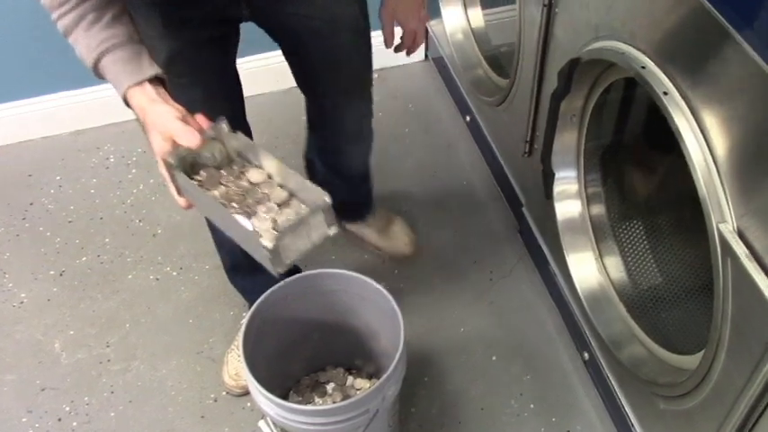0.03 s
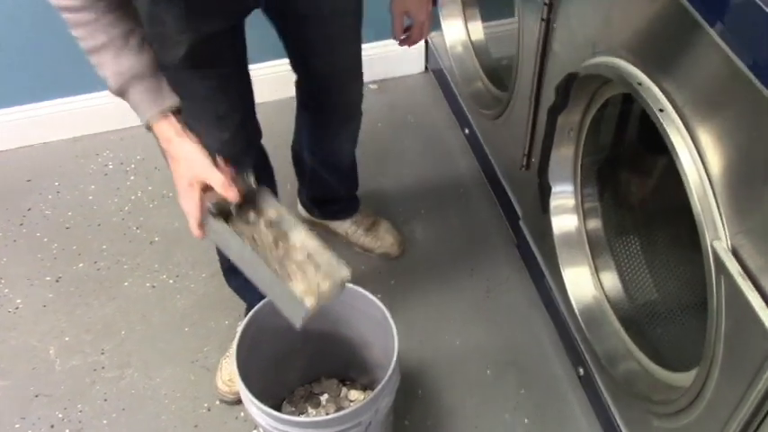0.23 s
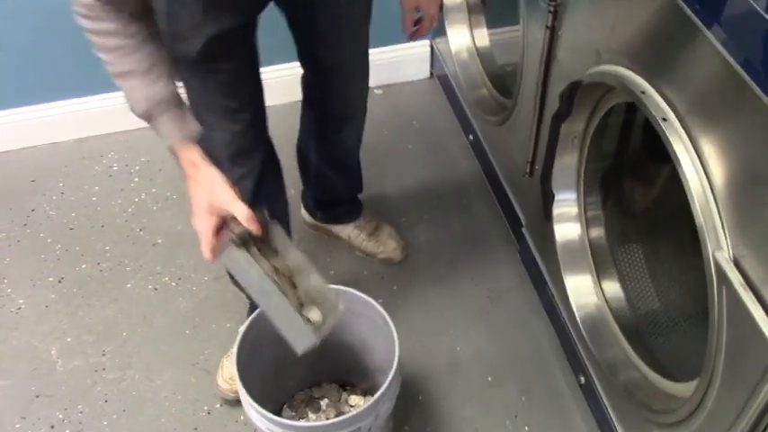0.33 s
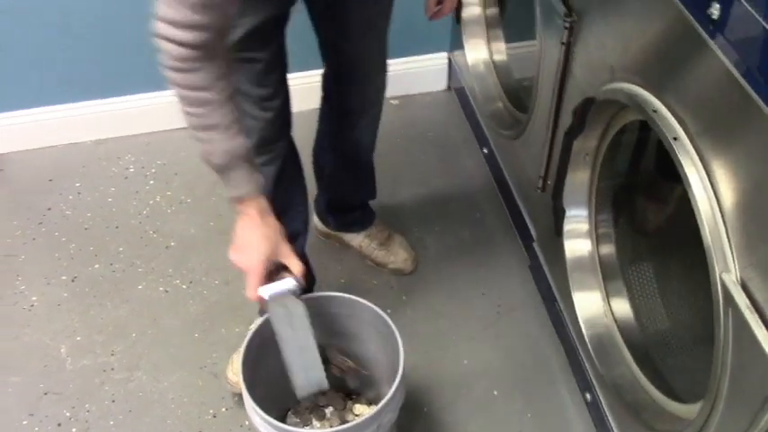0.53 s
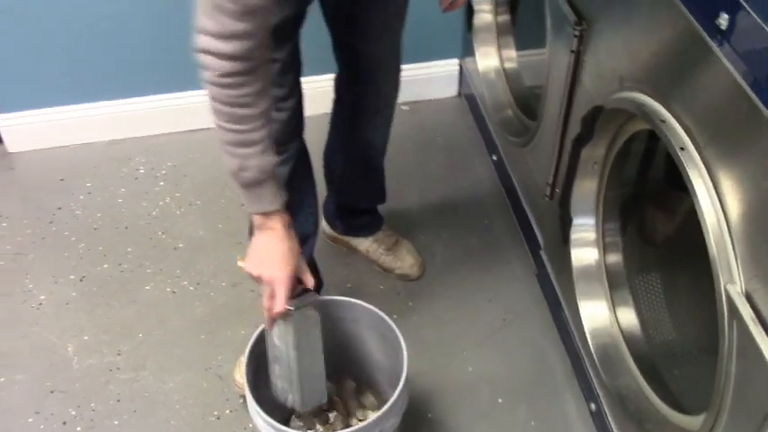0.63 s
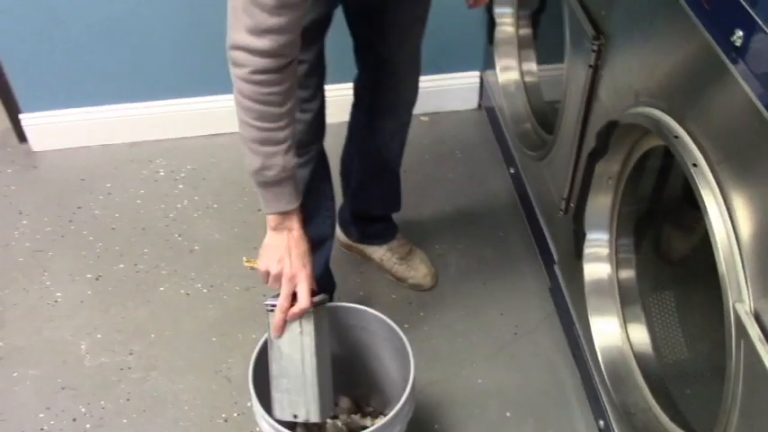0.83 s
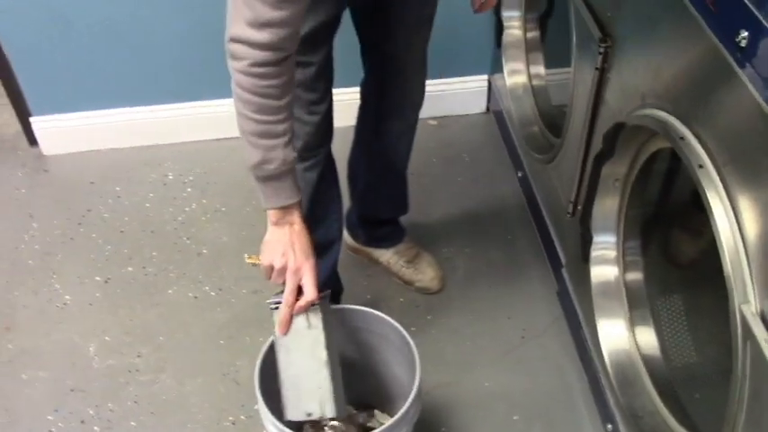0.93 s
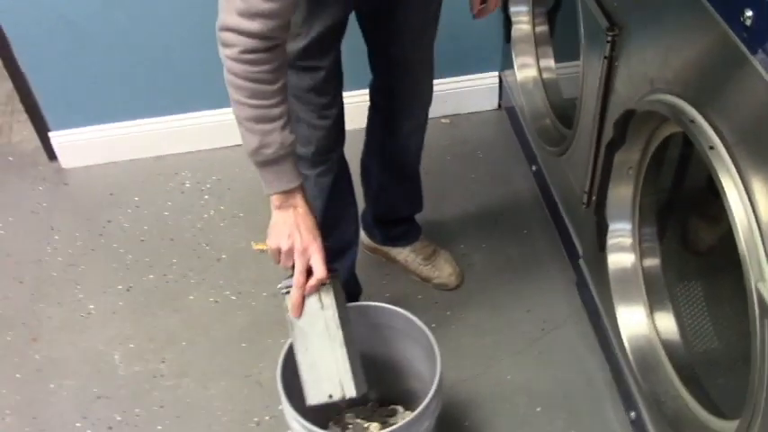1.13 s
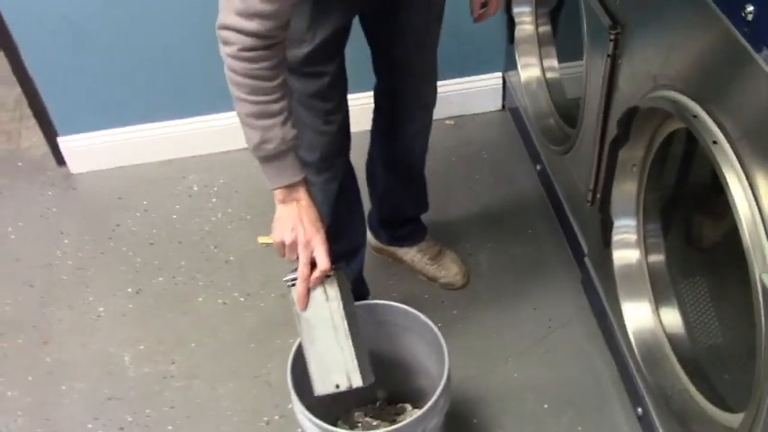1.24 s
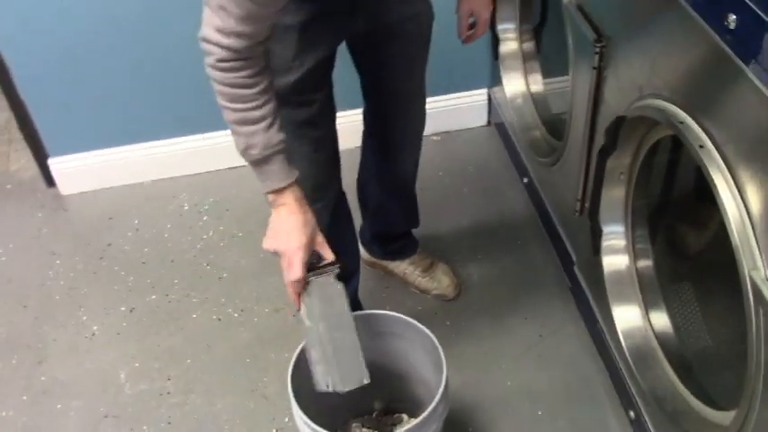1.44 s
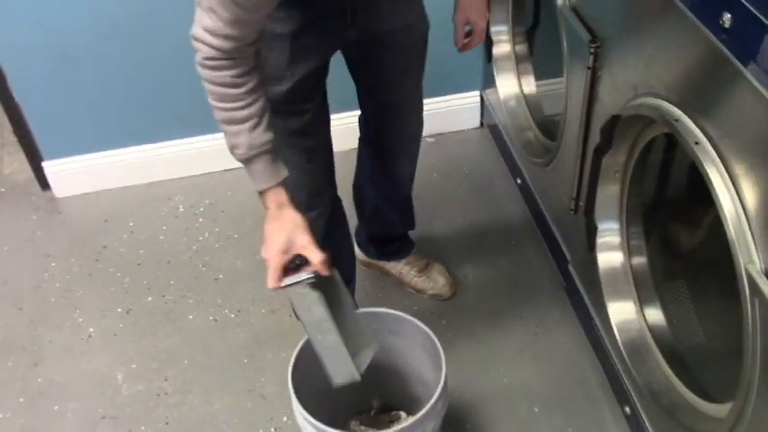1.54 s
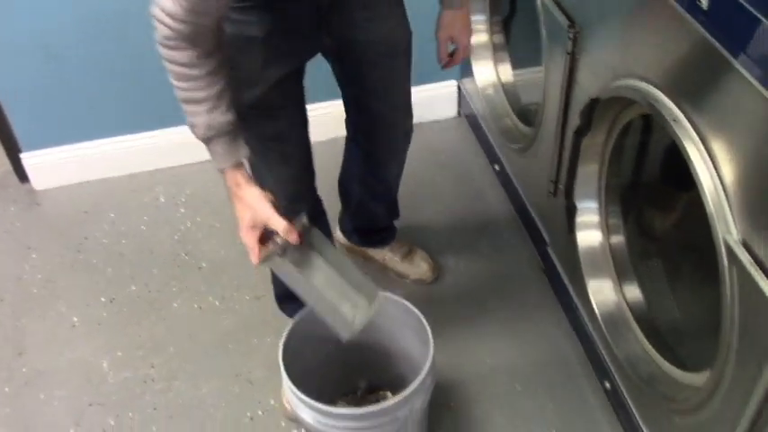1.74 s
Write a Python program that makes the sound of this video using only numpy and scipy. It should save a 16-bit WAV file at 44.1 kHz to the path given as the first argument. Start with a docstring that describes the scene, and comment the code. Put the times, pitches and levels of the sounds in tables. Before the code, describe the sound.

Coins clatter out of a steel box into a plastic bucket over rumbling laundry machines.

```python
"""Laundry machines rumble throughout in a hard-walled room. Coins shift in a steel coin box with a thin
scrape, then clatter down it as it tips. They pour into a plastic bucket partly filled with coins:
the stream clinks and rings on the heap, drums on the plastic and makes the bucket's floor boom.
Last, a few stragglers settle."""
import sys
import numpy as np
from scipy import signal
from scipy.io import wavfile
from scipy.ndimage import uniform_filter1d

SR = 44100
rng = np.random.default_rng(int(sys.argv[2]) if len(sys.argv) > 2 else 0)


def wav_out(sig):
    """Save sig, one row per channel (or a flat mono array), as 16-bit PCM at SR to the path in sys.argv[1]."""
    wavfile.write(sys.argv[1], SR, np.round(np.clip(np.atleast_2d(sig).T, -1, 1) * 32767).astype(np.int16))


N = 79380
T = np.arange(N) / SR
SLIDE_PER_S, POUR_PER_S, DRUM_PER_S, RINGS_PER_S = 3600, 3700, 1500, 1600  # coin contacts


def amp(db):
    """Decibels to gain."""
    return 10 ** (np.asarray(db) / 20)


def unit(x):
    """Scales to rms 1."""
    return x / np.sqrt(np.mean(x ** 2) + 1e-20)


def fader(curve):
    """Gain over time from (s, dB) points, silent before the first."""
    s, db = np.transpose(curve)
    return amp(np.interp(T, s, db, left=-100))


def read(points, hz):
    """Reads a table on a log-frequency axis."""
    f, value = np.transpose(points)
    return np.interp(np.log(hz + 1), np.log(f + 1), value)


def through(x, response):
    """Plays x through a response scaled to unit energy."""
    return signal.fftconvolve(x, response / np.linalg.norm(response))[:N]


def tick(spectrum, size=2048):
    """The shortest causal click with this spectrum."""
    log_gain = np.log(amp(read(spectrum, abs(np.fft.fftfreq(size, 1 / SR)))))
    return np.fft.ifft(np.exp(np.conj(signal.hilbert(log_gain)))).real[:size // 2]


def ring(modes, pitch=1):
    """Dying sines of a struck object."""
    t = T[:N // 4]
    return sum(amp(db - 60 * t / t60) * np.cos(2 * np.pi * hz * pitch * t) for hz, db, t60 in modes)


def steady(x, size=1200):
    """Evens out the power of x over size samples."""
    return x / np.sqrt(abs(uniform_filter1d(uniform_filter1d(x ** 2, size), size)) + 1e-12)


def contacts(per_s, spread_db=1, clump_db=-1.44, clump_s=0.021):
    """Random clicks of uneven size that swell in loose clumps; power 1."""
    sizes = amp(spread_db * np.minimum(rng.exponential(1, N), 4)) * rng.choice([-1, 1], N)
    swell = unit(uniform_filter1d(rng.standard_normal(N), int(clump_s * SR)))
    return steady(sizes * (rng.random(N) < per_s / SR) * amp(clump_db * swell))


def volleys(hits):
    """A short burst of contacts for each clump of coins that hits together."""
    out = np.zeros(N)
    for s, db, length, *_ in hits:
        age = np.maximum(T - s, 0) / length
        volley = contacts(2 * SLIDE_PER_S) * (T >= s) * np.exp(-age ** 2)
        out += amp(db) * volley * np.sqrt(length * SR / 2) / (np.linalg.norm(volley) + 1e-9)
    return out


def knocks(hits, modes):
    """Clumps of coins set a wall ringing, each at its own wall level."""
    return through(volleys([(s, wall_db, length) for s, _, length, wall_db in hits]), ring(modes))


# Rumble tone. Each row: frequency in Hz, relative level in dB.
RUMBLE_EQ = [(25, -15), (60, -14), (130, -10.5), (330, 1.5), (500, -7), (700, -9), (1200, -14), (2800, -18),
             (5000, -25.5), (10000, -31), (16000, -76)]
# Hum partials. Each row: frequency in Hz, level in dB.
HUM_TONES = [(120, -48), (171, -40), (243, -39.5), (362, -40), (485, -45.5)]
def machines(rumble_db=-33, side_db=-26.5, waver_depth=.6):
    """The stereo bed: laundry machines rumble under a wavering hum."""
    mid, side = (unit(through(rng.standard_normal(N), tick(RUMBLE_EQ))) for _ in range(2))
    hum = 0
    for hz, db in HUM_TONES:
        drift = [unit(uniform_filter1d(uniform_filter1d(noise, size=2000), size=1000))
                 for noise in rng.standard_normal((2, N))]
        waver = 1 + waver_depth * (drift[0] + 1j * drift[1])
        tone = np.exp(2j * np.pi * (hz * T + rng.random()))
        hum += amp(db) * unit((waver * tone).real)
    return hum + amp(rumble_db) * (mid + amp(side_db) * side * np.array([[1], [-1]]))


# Crackle fader. Each row: time in seconds, level in dB.
CRACKLE_FADER = [(.68, -50), (.8, -23.5), (.92, -30.5), (1.04, -28), (1.09, -41), (1.3, -39), (1.45, -52)]
# Crackle tone. Each row: frequency in Hz, relative level in dB.
CRACKLE_EQ = [(40, -18), (130, -2.5), (300, 0), (700, 0), (1100, -13), (2000, -17), (16000, -34)]
def crackle():
    """A dull, wide crackle under the thick of the stream."""
    return np.array([through(contacts(DRUM_PER_S) * fader(CRACKLE_FADER), tick(CRACKLE_EQ))
                     for _ in range(2)])


# Boom fader. Each row: time in seconds, level in dB.
BOOM_FADER = [(.66, -44), (.74, -22.5), (.83, -30.5), (.93, -17), (1.01, -28), (1.14, -15.5), (1.22, -15.5),
              (1.29, -24.5), (1.42, -23.5), (1.55, -44.5)]
# The floor's modes. Each row: frequency in Hz, relative level in dB, t60 in seconds.
FLOOR_RING = [(203.6, 3, 0.36), (378.3, -5.5, 0.2), (499, -1.5, 0.14)]
def bucket_floor():
    """The low end: the bucket's floor booms under the weight of the stream."""
    return fader(BOOM_FADER) * steady(through(contacts(DRUM_PER_S), ring(FLOOR_RING)), size=2000)


# Patter fader. Each row: time in seconds, level in dB.
PATTER_FADER = [(.64, -55), (.7, -10.5), (.755, -6), (.84, -14), (.93, -12.5), (1.03, -13), (1.13, -11.5),
                (1.22, -12), (1.3, -12.5), (1.43, -14), (1.51, -28.5), (1.6, -58), (1.8, -39)]
# Coin on plastic. Each row: frequency in Hz, relative level in dB.
PLASTIC_EQ = [(50, -47), (110, -27), (200, -8.5), (380, -0.5), (700, -1.5), (1000, 3), (1350, 5),
              (1650, 1.5), (2000, 3.5), (2900, 2), (4000, -7), (5500, -14), (9000, -41), (16000, -55)]
# Heavy hits. Each row: start in seconds, level in dB, length in seconds, wall level in dB.
BUCKET_HITS = [(.662, -1, 0.011, -2.5), (.708, -6.5, 0.0038, -8), (1.072, -4.5, 0.0068, -16),
               (1.123, -9.5, 0.026, -17), (1.185, -8.5, 0.01, -21), (1.256, -15, 0.014, -10.5),
               (1.291, -4, 0.0053, -7), (1.329, -24, 0.004, -13), (1.404, -13, 0.0093, -5),
               (1.432, -10.5, 0.012, -14), (1.481, -11.5, 0.0042, -18)]
# The wall's modes. Each row: frequency in Hz, relative level in dB, t60 in seconds.
PLASTIC_RING = [(539, -5, 0.095), (1010, -3.5, 0.027), (1339, 3.5, 0.06), (1540, -3, 0.013),
                (2000, -10, 0.027), (2903, -3, 0.027)]
def bucket():
    """The body: coins patter dully on the plastic, and heavy clumps make its wall knock."""
    strikes = contacts(DRUM_PER_S) * fader(PATTER_FADER) + volleys(BUCKET_HITS)
    return through(strikes, tick(PLASTIC_EQ)) + knocks(BUCKET_HITS, PLASTIC_RING)


# Faders for the first scrape, the slide and the wall's ring. Each row: time in seconds, level in dB.
SCRAPE_FADER = [(.02, -59), (.07, -41.5), (.15, -36), (.2, -43), (.26, -60)]
SLIDE_FADER = [(0, -47.5), (.09, -41.5), (.15, -31.5), (.185, -34), (.255, -22), (.3, -15.5), (.4, -8.5),
               (.52, -2.5), (.63, -7), (.74, -8.5), (.85, -22), (1.3, -27), (1.55, -41.5), (1.65, -37.5),
               (1.72, -46), (1.8, -46)]
STEEL_FADER = [(.19, -37), (.25, -32), (.31, -29), (.42, -8), (.51, -18), (.62, -18.5), (.75, -14.5),
               (.85, -34), (1.5, -67)]
# Coin on steel. Each row: frequency in Hz, relative level in dB.
STEEL_EQ = [(100, -51), (550, -19.5), (850, -6), (1400, -1), (2400, 1.5), (3200, -1), (4400, 3), (5400, 0),
            (8000, 3), (10500, -3), (13000, -8.5), (16000, -10)]
# The load lurches. Each row: start in seconds, level in dB, length in seconds, wall level in dB.
BOX_HITS = [(.219, -9.5, 0.0073, -26), (.264, -7, 0.0036, -40), (.3031, -7.5, 0.0045, -13),
            (.345, -3, 0.0069, -7), (.3914, -1, .008, -16), (.414, -2, 0.014, -33),
            (.4553, -3, 0.0065, -31), (.632, -2, 0.018, -11)]
# Scrape and wall modes. Each row: frequency in Hz, relative level in dB, t60 in seconds.
SCRAPE_RING = [(3200, 0, 0.01)]
STEEL_RING = [(800, -14, .08), (1390, -16, .045), (1419, 17, 0.12), (1490, 29.5, 0.039), (1530, -12, .04),
              (1710, -17, .06), (2420, -21, .04), (4400, -2, .03), (4300, -16, .025)]
def coin_box():
    """Coins scrape and lurch down the steel box, whose walls ring most while it is loaded."""
    clatter = through(contacts(SLIDE_PER_S) * fader(SLIDE_FADER) + volleys(BOX_HITS), tick(STEEL_EQ))
    scrape = through(contacts(SLIDE_PER_S) * fader(SCRAPE_FADER), ring(SCRAPE_RING))
    wall = fader(STEEL_FADER) * steady(through(contacts(DRUM_PER_S), ring(STEEL_RING)))
    return clatter + scrape + wall + knocks(BOX_HITS, STEEL_RING)


# Stream fader. Each row: time in seconds, level in dB.
POUR_FADER = [(0, -77), (.18, -69), (.32, -34), (.5, -13.5), (.68, -11), (.8, -7.5), (.92, -7.5),
              (1.04, -6.5), (1.09, -13), (1.2, -6), (1.3, -10), (1.44, -12.5), (1.5, -26), (1.56, -37.5),
              (1.6, -49), (1.8, -83)]
# Coin on coin. Each row: frequency in Hz, relative level in dB.
HEAP_EQ = [(200, -44), (1500, -19), (3500, -1.5), (5300, -8), (7000, 0), (8500, 2), (10200, 3),
           (12200, -3.5), (14000, 1), (16000, -17)]
# Clinks. Each row: start in seconds, level in dB, length in seconds, ring over tick in dB.
HEAP_HITS = [(0.801, -6, 0.0032, 11), (1.122, -3.5, 0.017, -5), (1.254, -5, 0.03, 0.5),
             (1.325, -6.5, 0.016, 5), (1.3622, -8, 0.016, 6), (1.52, -35, 0.011, 17),
             (1.537, -27, 0.022, 8), (1.621, -36, 0.0066, 0)]
# A coin's modes. Each row: frequency in Hz, relative level in dB, t60 in seconds.
COIN_RING = [(9050, -7, .025), (9300, 0, .04), (15420, -.5, .04)]
def heap(count=24, pitch_spread=.0115):
    """The lead: coin meets coin with a bright tick and a brief ring at each coin's own pitch."""
    flow = fader(POUR_FADER)
    accents = volleys([(s, db + ring_db, length) for s, db, length, ring_db in HEAP_HITS])
    strikes = contacts(RINGS_PER_S) * flow + accents
    coin = rng.integers(0, count, N)
    pitches = 1 + pitch_spread * np.arctanh(2 * (np.arange(count) + .5) / count - 1)
    rings = sum(through(strikes * (coin == k), ring(COIN_RING, pitches[k])) for k in range(count))
    ticks = through(contacts(POUR_PER_S) * flow + volleys(HEAP_HITS), tick(HEAP_EQ))
    return ticks + rings


def echoes(x, t60s, count=16):
    """Diffuse reflections that die by band and change as the coins move."""
    out = 0
    for k in range(count):
        hz, t, noise = signal.stft(rng.standard_normal(SR // 3), SR, nperseg=128)
        tail = signal.istft(noise * amp(-60 * t / read(t60s, hz)[:, None]), SR, nperseg=128)[1]
        crossfade = np.sin(np.pi / 2 * np.minimum((T * 90 - k) % count, 2))  # 90 tails a second
        out += through(x * crossfade, tail)
    return out


# Room reverb. Each row: frequency in Hz, t60 in seconds.
ROOM_DECAY = [(150, 1), (1000, 0.42), (4000, 0.4), (9000, 0.093), (16000, 0.067)]
# Stereo width. Each row: frequency in Hz, side level in dB.
SIDE_EQ = [(100, -32), (300, -22), (600, -18), (1300, -67), (3000, -49), (4500, -16), (9000, -18.5),
           (15000, -21)]
def scene(near_db=-7, near_t60_s=0.044, room_db=-11):
    """The mix: the pour, its echoes from the containers and the room, and the machines behind."""
    direct = coin_box() + heap() + bucket()
    containers = amp(near_db) * echoes(direct, [(100, near_t60_s), (16000, near_t60_s)])
    near = (direct + containers) / np.sqrt(1 + amp(near_db) ** 2)
    mid = near + amp(room_db) * echoes(near, ROOM_DECAY) + bucket_floor()
    side = signal.fftconvolve(echoes(mid, [(100, 0.041), (16000, 0.15)]), tick(SIDE_EQ))[:N]
    return mid + side * np.array([[1], [-1]]) + crackle() + machines()


LOW_CUT_HZ, HIGH_CUT_HZ = 94, 15740
DUCK_ABOVE_DB, DUCK_SHARE, DUCK_ATTACK_S, RECOVER_DB_PER_S = -17.5, 0.6, 0.037, 130
def record(dry):
    """The master chain: low cut, gain control that ducks the loud pour, soft clip, high cut."""
    dry = signal.sosfilt(signal.butter(2, LOW_CUT_HZ, "high", fs=SR, output="sos"), dry)
    pole = np.exp(-1 / (DUCK_ATTACK_S * SR))
    power_db = 10 * np.log10(signal.lfilter([1 - pole], [1, -pole], (dry ** 2).mean(0)) + 1e-12)
    fall = T * RECOVER_DB_PER_S
    held_db = np.maximum.accumulate(power_db + fall) - fall
    ducked = dry / amp(DUCK_SHARE * np.maximum(held_db - DUCK_ABOVE_DB, 0))
    rounded = ducked / (1 + abs(ducked / .95) ** 6) ** (1 / 6)
    high_cut = signal.firwin(1023, HIGH_CUT_HZ, window=("kaiser", 9), fs=SR)
    return signal.oaconvolve(rounded, high_cut[None], "same")


dry = scene()
out = record(dry)
wav_out(out)
```